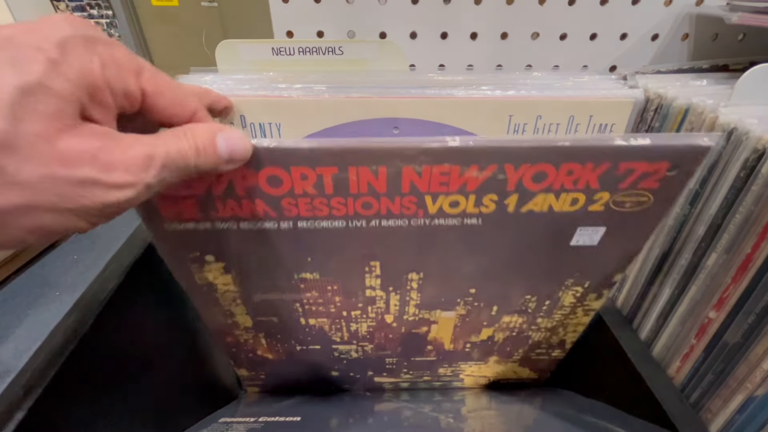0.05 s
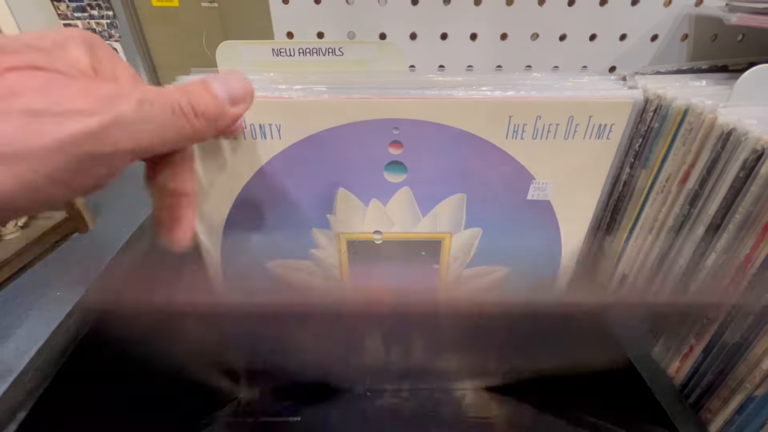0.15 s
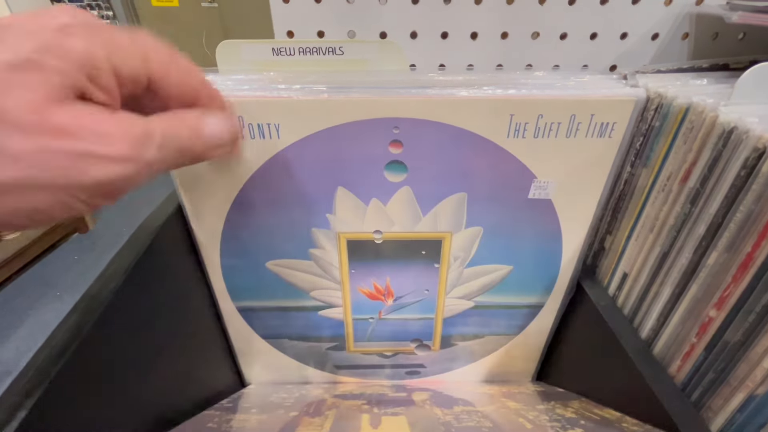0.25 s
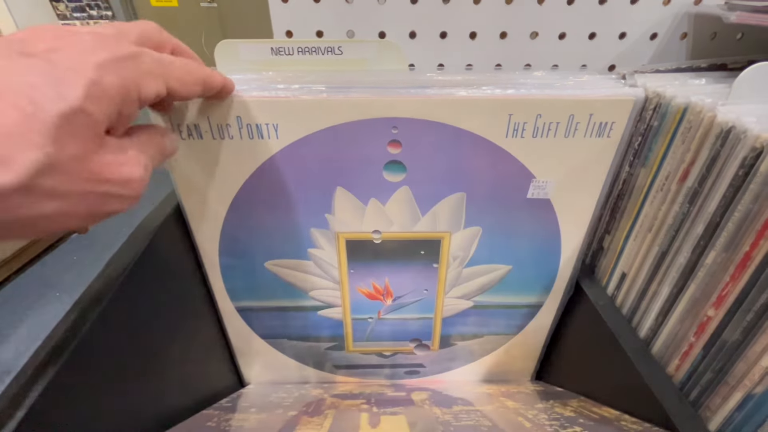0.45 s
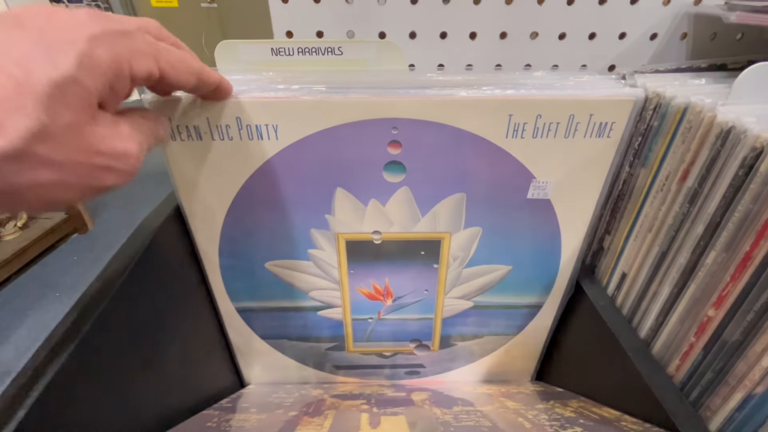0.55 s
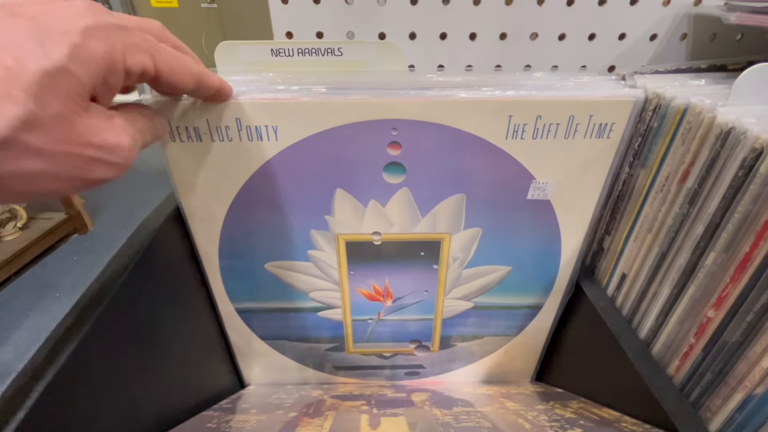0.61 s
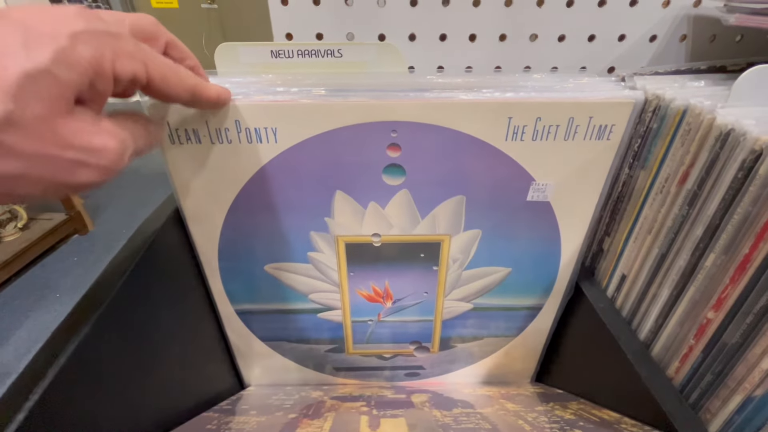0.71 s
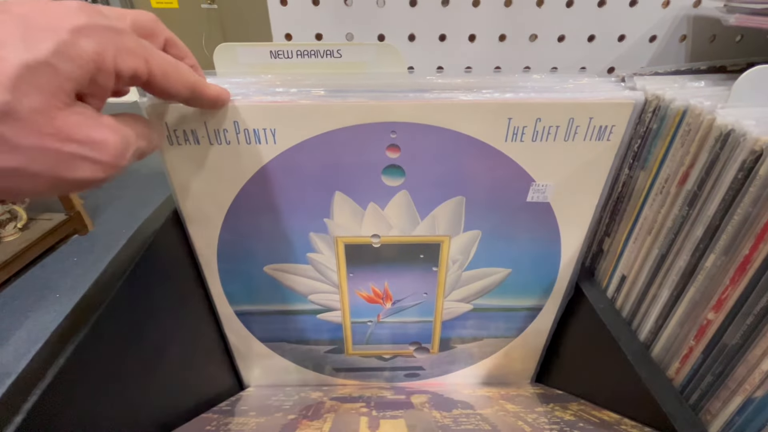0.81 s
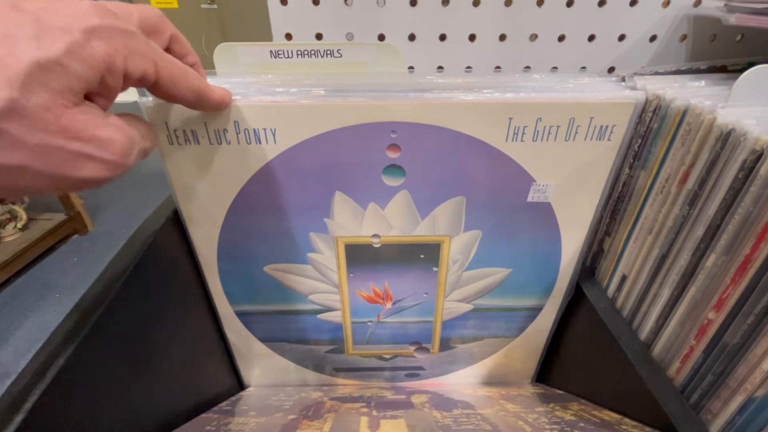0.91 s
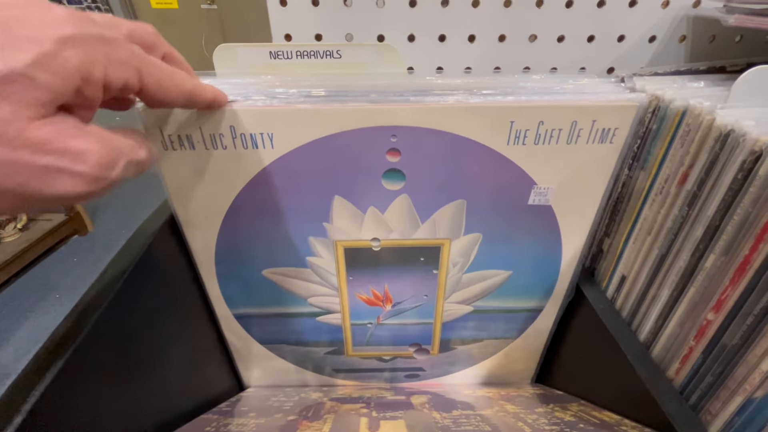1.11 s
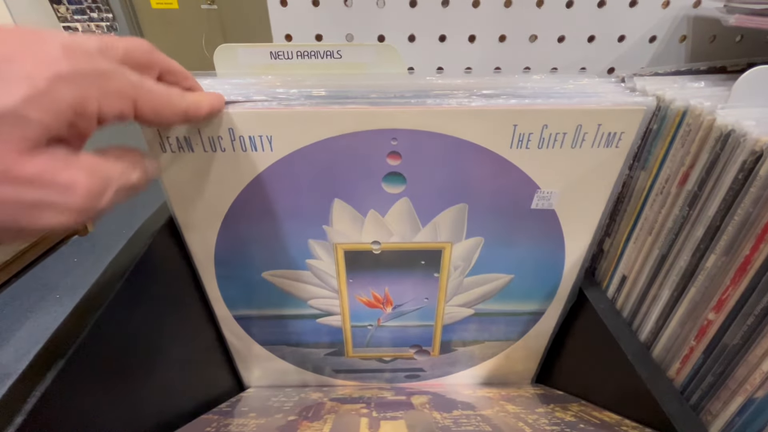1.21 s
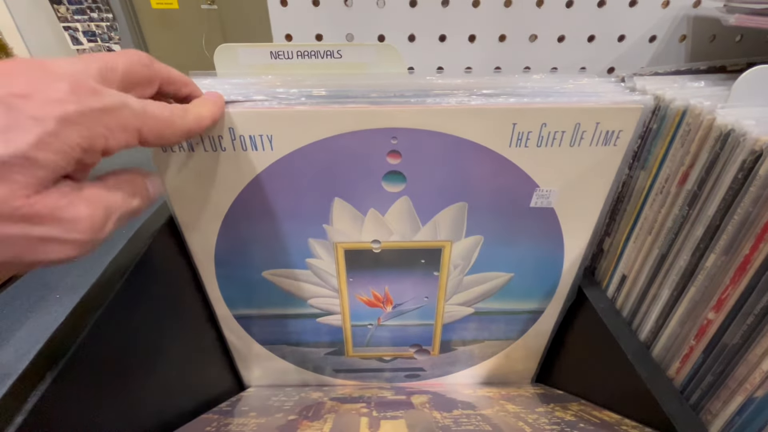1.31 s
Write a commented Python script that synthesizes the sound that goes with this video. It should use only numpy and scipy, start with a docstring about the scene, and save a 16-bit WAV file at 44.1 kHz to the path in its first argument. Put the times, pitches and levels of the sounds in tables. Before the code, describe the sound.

A plastic-wrapped record slides forward in a bin with a brief hiss and lands with a snapping thud. Fingertips then lightly brush, tap and crackle the next sleeve, close by, over a quiet shop's ventilation hum.

```python
"""A shop's ventilation hums throughout. A record in a plastic-wrapped cardboard sleeve is flipped
forward in its bin, hissing as wrap drags on wrap. It lands with a snap and a double thud (first the
edge, then the face), sets the stack of records swaying and rocks back once. Fingertips then brush
the next sleeve, a nail taps its edge, and the wrap crackles between the last light strokes."""
import sys
import numpy as np
from scipy import signal
from scipy.fft import rfft, irfft
from scipy.io import wavfile

SR = 44100
rng = np.random.default_rng(int(sys.argv[2]) if len(sys.argv) > 2 else 0)


def unload_audio(sound):
    """Save the sound as a 16-bit wav file, at the path given as the first command line argument."""
    columns = np.transpose(np.atleast_2d(sound))
    # keep every value between -1 and 1, then stretch to whole-number steps
    steps = np.round(np.clip(columns, -1, 1) * 32767)
    wavfile.write(sys.argv[1], SR, steps.astype(np.int16))


N = 59535

# The fan's tones. Each row: pitch in Hz, average level in dB.
FAN_TONES = [(113.5, -38), (151, -44), (231.5, -47.5), (403.7, -62)]
# How loud the slide is over time. Each row: time in seconds, level in dB.
SLIDE_LEVELS = [(0, -81), (.035, -54.5), (.055, -51), (.072, -35), (0.08, -54.5), (0.091, -45),
                (0.098, -36.5), (.122, -34), (0.149, -37.5), (.175, -36), (0.202, -37.5), (0.218, -30.5),
                (.228, -62.5), (.25, -70)]
# Finger strokes. Each row: start, rise, hold and fade times in seconds, then level in dB.
STROKES = [(0.247, 0.0114, 0.0137, 0.045, -60), (0.318, 0.0079, 0.00217, 0.0174, -51),
           (0.386, 0.0486, 0.083, 0.00853, -59), (0.508, 0.00166, 0.0183, 0.0253, -47),
           (0.532, 0.0138, 0.0269, 0.077, -51.5), (0.853, 0.0454, 0.0128, 0.0137, -56.5),
           (0.97, 0.027, 0.131, 0.053, -58), (1.293, 0.039, 0.0095, 0.0194, -66)]
# The wrap buckling. Each row: start in seconds, strength in dB, fade time in seconds, low cut in Hz.
CRACKLES = [(0.2163, -31.5, 0.00188, 1500), (0.9328, -36, 0.0013, 6980), (1.032, -52, 0.00108, 6000),
            (1.110, -48.5, 0.00335, 2000), (1.1635, -42, 0.00176, 4000), (1.1687, -35.5, 0.00129, 4000),
            (1.1932, -51, 0.0012, 5000)]
# How the sleeve's edge rings. Each row: pitch in Hz, relative level in dB, seconds to fade by 60 dB.
EDGE_TONES = [(1304, -1, 0.019), (2306, 2, 0.0136), (3720, -5.5, 0.0078), (5700, -6.5, 0.0027),
              (7550, 2.5, 0.0068), (8120, 1, 0.0091), (11440, -7, 0.0046), (12900, -14, .003)]
# Pushes on the stack. Each row: start in seconds, level in dB, dB by which the left is louder.
PUSHES = [(0.2314, -4, 4.5), (0.2849, -21, 8)]
# The top edge hits the stack. One row: start in seconds, peak in dB, high cut in Hz, seconds a 100 Hz
# wave takes to arrive, extra seconds on the right, dB by which the bass is louder on the left.
EDGE_SLAP = (0.21576, 0.514, 15700, .008, 0.00052, 7.6)
# The sleeve's face pushes the stack, then rocks back. Each row reads like the slap's.
FACE_THUDS = [(0.2336, 1, 2100, 0.002537, 0.000935, 7.3), (.2820, -7.5, 476, 0.00212, 0.001144, 11)]

# Colour is the mix of bass and treble. Each row: frequency in Hz, relative level in dB.
AIR_COLOUR = [(15, -40.5), (25, -54), (43, -14), (82, -11.5), (97, -10), (117, -5.5), (180, -12.5),
              (223, -10.5), (270, -12), (309, -13.5), (344, -22), (384, -15.5), (427, -17), (1290, -28),
              (2050, -32), (12900, -60.5), (16000, -83.5)]
SLIDE_COLOUR = [(290, -41), (500, -9), (769, -2.5), (1090, -9), (1290, -6.5), (1770, -2), (2930, -10.5),
                (3190, -9.5), (7030, -12.5), (12300, -7), (14600, -8.5), (15500, -30)]
STROKE_COLOUR = [(200, -32), (900, 4.5), (2200, 3.5), (4500, -4), (8300, 3.5), (10500, 0), (12500, 0),
                 (15500, -11.5)]
CRACKLE_COLOUR = [(400, -34.5), (2000, -8), (4000, -9.5), (5500, -3.5), (8200, -1.5), (9500, -2),
                  (10700, -12.5), (12500, -3), (15500, -16)]
SLAP_COLOUR = [(30, -33), (90, -10.5), (165, 10), (240, -1), (360, 2), (600, -14.5), (820, -5), (1000, -7),
               (1300, -20), (1850, -15), (2300, -32), (3500, -25.5), (6000, -36.5), (14000, -49)]
THUD_COLOUR = [(20, -16), (45, -7.5), (75, -16.5), (115, -7), (190, -3), (260, -6.5), (400, -12),
               (600, -35.5), (800, -16.5), (1100, -23.5), (1450, -26.5), (1950, -27), (2500, -50.5),
               (6000, -68)]
# Pan is the side a sound leans to. Each row: frequency in Hz, dB by which the left is louder.
AIR_PAN = [(60, 3.5), (400, -0.5), (2400, 1.5), (14000, 0)]
SLIDE_PAN = [(700, 17), (2400, 3), (4400, 4.5), (8100, -4.5), (14000, -.5)]
WRAP_PAN = [(1000, -4.5), (4400, 6.5), (8100, -6.5), (14000, -1)]
# How alike the two sides are. Each row: frequency in Hz, likeness from 0 (unrelated) to 1 (the same).
AIR_LIKENESS = [(60, 1), (130, 0.918), (290, 0.755), (640, 0.281), (1400, 0.05), (7000, 0.093),
                (14000, 0.82)]
WRAP_LIKENESS = [(500, 0.43), (3000, 0.506), (7000, 0.15), (12500, 0.49)]
# How long echoes last. Each row: frequency in Hz, seconds to fade by 60 dB.
BIN_FADE = [(60, 0.154), (300, 0.258), (800, 0.043), (2000, 0.055), (10000, 0.0816)]
SHOP_FADE = [(100, 0.96), (2000, 0.22), (12000, .25)]


def amp(db):
    """Turns decibels into a number to multiply by."""
    return 10 ** (np.asarray(db) / 20)


def evened(x):
    """Scales a signal to an average power of 1."""
    return x / np.sqrt(np.mean(x ** 2) + 1e-20)


def read(table, hz):
    """Looks up a frequency in a table, blending between rows by pitch."""
    row_hz, value = np.transpose(table)
    return np.interp(np.log(hz + 1), np.log(row_hz + 1), value)


def add(mix, start, sound):
    """Mixes a stereo sound in at a start time in seconds."""
    part = mix[:, max(round(start * SR), 0):][:, :sound.shape[1]]
    part += sound[:, :part.shape[1]]


def causal(gain):
    """Makes a filter with these gains that never rings before it is struck."""
    log_gain = np.log(np.maximum(np.concatenate([gain, gain[-2:0:-1]]), 1e-5))
    return np.exp(np.conj(signal.hilbert(log_gain)))[:len(gain)]


def coloured(pair, colour, likeness, pan, size=4096):
    """Gives two unrelated noises a colour, a likeness and a pan, at the same power."""
    hz, fine_hz = np.fft.rfftfreq(size, 1 / SR), np.fft.rfftfreq(N, 1 / SR)
    shared, opposed = rfft(pair)
    turn = np.arccos(np.clip(read(likeness, fine_hz), -1, 1)) / 2
    pair = irfft([shared * np.cos(turn) + side * opposed * np.sin(turn) for side in (1, -1)], N)
    gains = [amp(read(colour, hz) + side * read(pan, hz) / 2) for side in (1, -1)]
    filters = np.array([irfft(causal(gain)) for gain in gains])
    return signal.fftconvolve(pair, evened(filters) / np.sqrt(size), axes=1)[:, :N]


def wander(rate_hz):
    """Makes a slow random wobble."""
    keep_slow = np.exp(-(np.fft.rfftfreq(N, 1 / SR) / rate_hz) ** 2)
    return evened(irfft(rfft(rng.standard_normal(N)) * keep_slow, N))


def friction(slips_per_s, spread_db=3):
    """Rubbing is thousands of tiny slips, each a click of random size."""
    size = amp(spread_db * np.minimum(rng.exponential(1, (2, N)), 5))
    return evened(size * rng.choice([-1, 1], (2, N)) * (rng.random((2, N)) < slips_per_s / SR))


def ventilation(waver_hz=7):
    """A fan's tones waver in a low rush of air."""
    t, hum = np.arange(N) / SR, np.zeros(N)
    for hz, db in FAN_TONES:
        level = amp(db) * np.sqrt(2) * (1 + 0.249 * wander(waver_hz))
        phase = 2 * np.pi * (hz * t + rng.random()) + 0.207 * wander(waver_hz)
        hum += level * np.sin(phase)
    air = coloured(rng.standard_normal((2, N)), AIR_COLOUR, AIR_LIKENESS, AIR_PAN)
    return hum * amp([[.5], [-.5]]) + amp(-39.5) * air


def echoes(sound, fade_times, size=256):
    """Many reflections blur into a tail, each frequency dying at its own speed."""
    hz, t, noise = signal.stft(rng.standard_normal((2, SR // 2)), SR, nperseg=size)
    fade = amp(-60 * t / read(fade_times, hz)[:, None])
    fade /= np.sqrt((fade ** 2).sum(1, keepdims=True) * size / 2)  # same energy in every band
    tail = signal.istft(noise * fade, SR, nperseg=size)[1]
    return signal.fftconvolve(sound, tail, axes=1)[:, :N]


def finger_strokes():
    """Fingertips rub lightly over the wrap."""
    t, level = np.arange(N) / SR, np.zeros(N)
    for start, rise, hold, fade, db in STROKES:
        swell = np.clip((t - start) / rise, 0, 1)
        level += amp(db) * swell * np.exp(-2 * np.maximum(t - start - rise - hold, 0) / fade)
    return coloured(level * friction(slips_per_s=7000), STROKE_COLOUR, WRAP_LIKENESS, WRAP_PAN)


def wrap_crackles():
    """The wrap buckles in short, bright bursts of noise."""
    t, out = np.arange(N) / SR, np.zeros((2, N))
    for start, db, fade, low_hz in CRACKLES:
        level = amp(db) * (t >= start) * np.exp(-((t - start) / fade / 2) ** 2)
        low_cut = signal.butter(2, low_hz, "high", fs=SR, output="sos")
        out += signal.sosfilt(low_cut, level * rng.standard_normal((2, N)))
    return coloured(out, CRACKLE_COLOUR, WRAP_LIKENESS, WRAP_PAN)


def nail_tap(start=.5133, peak_db=-16.5, contact_s=0.00155, size=2048):
    """A nail catches briefly on the sleeve's edge and makes it ring."""
    t, out = np.arange(size) / SR, np.zeros((2, N))
    sides = np.array([[.5], [-.5]])
    ring = sum(amp(db - 60 * t / fade + sides * read(WRAP_PAN, hz)) * np.sin(2 * np.pi * hz * t)
               for hz, db, fade in EDGE_TONES)
    scrape = 0.2136 * rng.standard_normal((2, size)) * np.exp(-(t / contact_s) ** 2)
    click = t == 0
    sound = signal.fftconvolve(ring, click + scrape, axes=1)
    add(out, start, amp(peak_db) * sound / abs(sound).max())
    return out


def sleeve_slide():
    """Wrap drags on wrap and hisses as the sleeve tips forward."""
    level = amp(np.interp(np.arange(N) / SR, *np.transpose(SLIDE_LEVELS), right=-np.inf))
    return coloured(level * friction(slips_per_s=6400), SLIDE_COLOUR, WRAP_LIKENESS, SLIDE_PAN)


def stack_sway(start_hz=79.7, sink_hz_per_s=351, swell_s=0.00964, right_lag_s=0.00341):
    """Each push sways the leaning records for a few cycles, sinking in pitch."""
    t, out = np.arange(SR // 6) / SR, np.zeros((2, N))
    hz = np.maximum(start_hz - sink_hz_per_s * t, start_hz / 2)
    level = t / swell_s * np.exp(1 - t / swell_s)
    left = level * np.sin(2 * np.pi * np.cumsum(hz) / SR)
    right = np.interp(t - right_lag_s, t, left)
    for start, db, pan_db in PUSHES:
        add(out, start, amp(db) * np.array([left, amp(-pan_db) * right]))
    return out


def blow(colour, peak_db, high_hz, lag_s, right_lag_s, pan_db, size=16384):
    """A bending wave crosses the sleeve, treble first, so each blow is a quick falling chirp."""
    hz = np.fft.rfftfreq(size, 1 / SR) + 1
    gain = amp(read(colour, hz)) / np.sqrt(1 + (hz / high_hz) ** 8)
    right_gain = gain * amp(-pan_db / (1 + (hz / 5000) ** 2))  # bass leans furthest left
    slowness = 100 / np.maximum(hz, 40)  # travel time compared with 100 Hz
    turns = np.cumsum(slowness) * SR / size
    left = irfft(causal(gain) * np.exp(-2j * np.pi * turns * lag_s))
    right = irfft(causal(right_gain) * np.exp(-2j * np.pi * turns * (lag_s + right_lag_s)))
    return amp(peak_db) * np.array([left, right]) / abs(left).max()


def sleeve_landing(lead_samples=512):
    """The sleeve hits the stack edge first, falls flat and rocks once."""
    out = np.zeros((2, N))
    for colour, rows in (SLAP_COLOUR, [EDGE_SLAP]), (THUD_COLOUR, FACE_THUDS):
        for start, *settings in rows:
            sound = np.roll(blow(colour, *settings), lead_samples, axis=1)
            soft_ends = signal.windows.tukey(sound.shape[1], lead_samples / sound.shape[1])
            add(out, start - lead_samples / SR, sound * soft_ends)
    return out


def scene():
    """Adds up the handling sounds, their echoes in the bin and the shop, and the ventilation."""
    near = sleeve_landing() + stack_sway() + sleeve_slide()
    near += finger_strokes() + wrap_crackles() + nail_tap()
    bin_echo = amp(-14.5) * echoes(near, BIN_FADE)
    shop_echo = amp(-31.5) * echoes(near, SHOP_FADE)
    return near + bin_echo + shop_echo + ventilation()


def record(dry, ceiling=.95, top_hz=15900):
    """Gently rounds the thud's highest peaks, then cuts the very top of the treble."""
    rounded = dry / (1 + abs(dry / ceiling) ** 6) ** (1 / 6)
    high_cut = signal.firwin(255, top_hz, window=("kaiser", 9), fs=SR)
    return signal.oaconvolve(rounded, high_cut[None], "same")


dry = scene()
out = record(dry)
unload_audio(out)
```